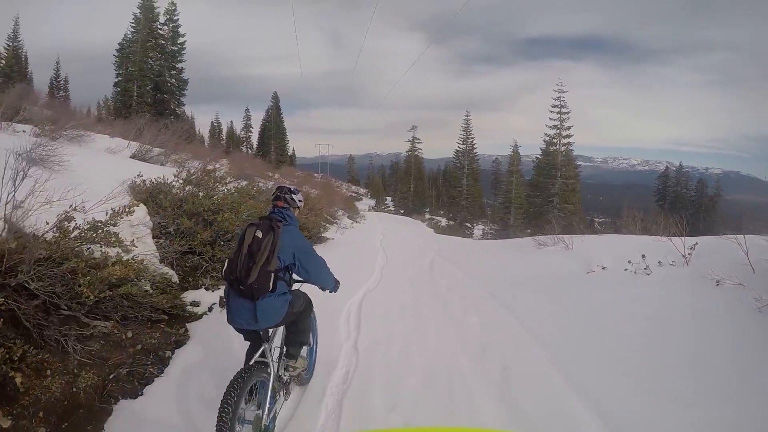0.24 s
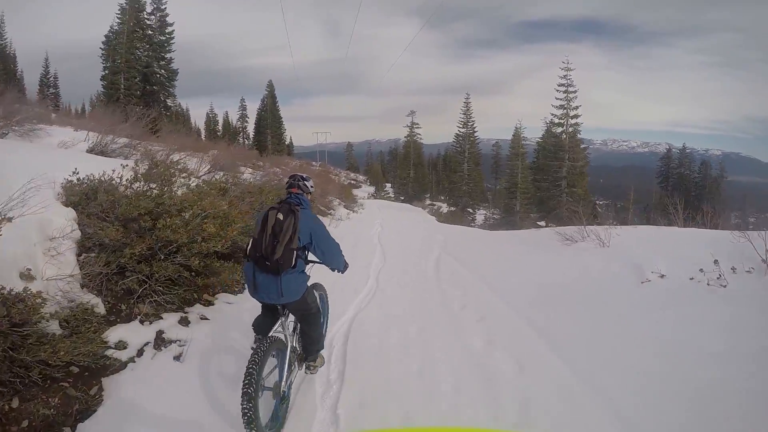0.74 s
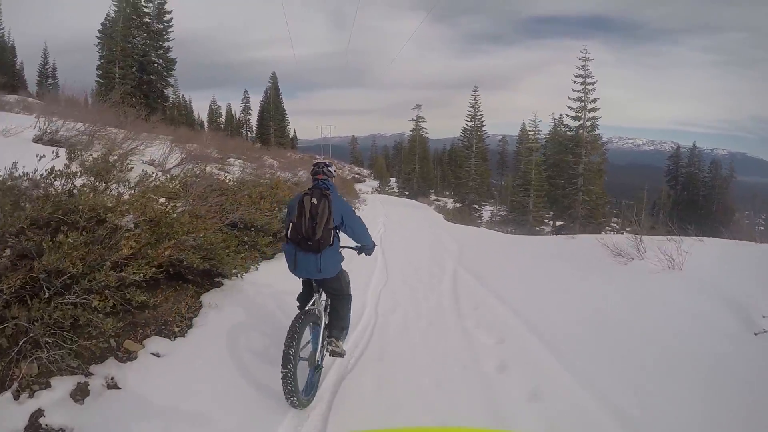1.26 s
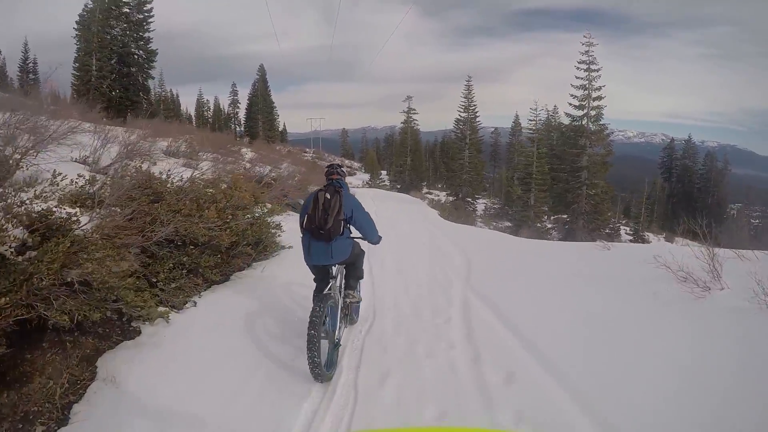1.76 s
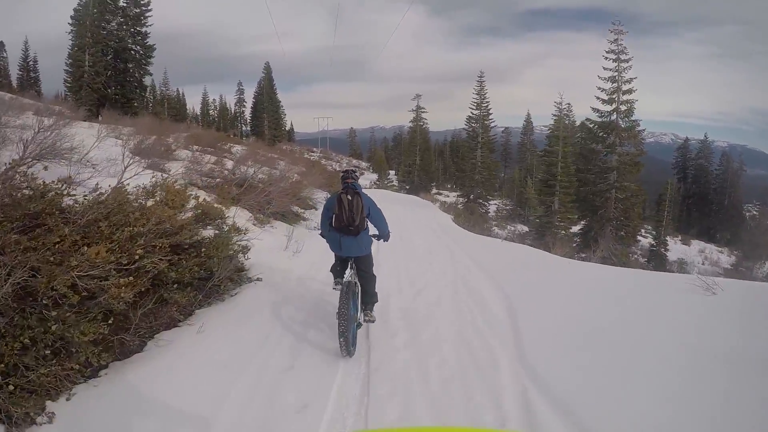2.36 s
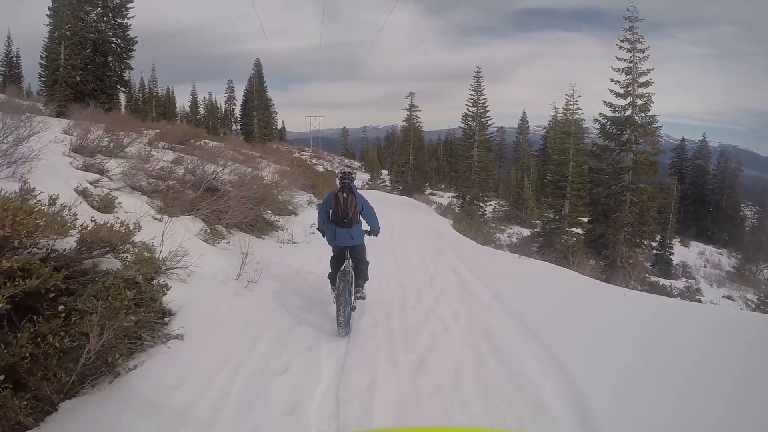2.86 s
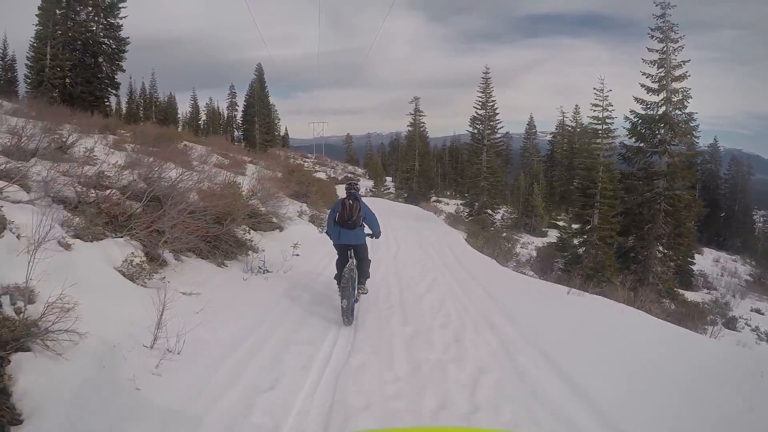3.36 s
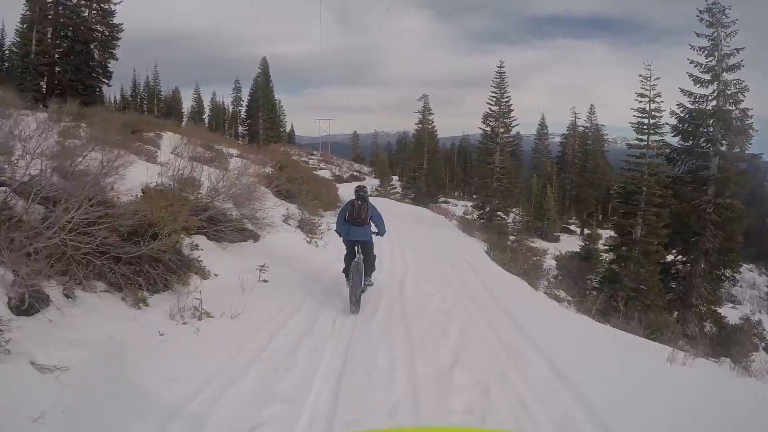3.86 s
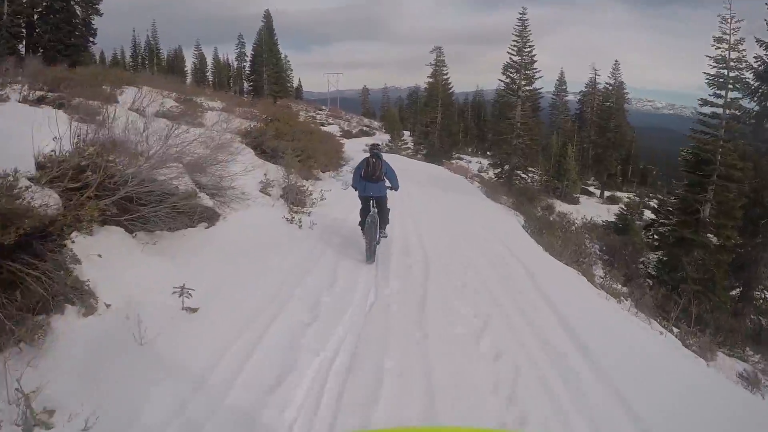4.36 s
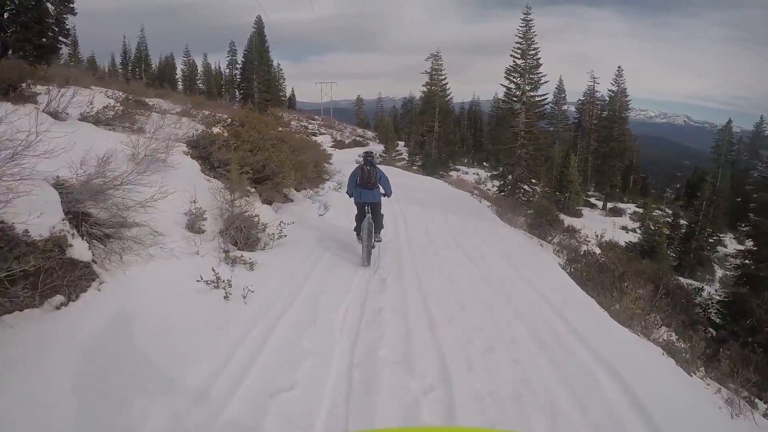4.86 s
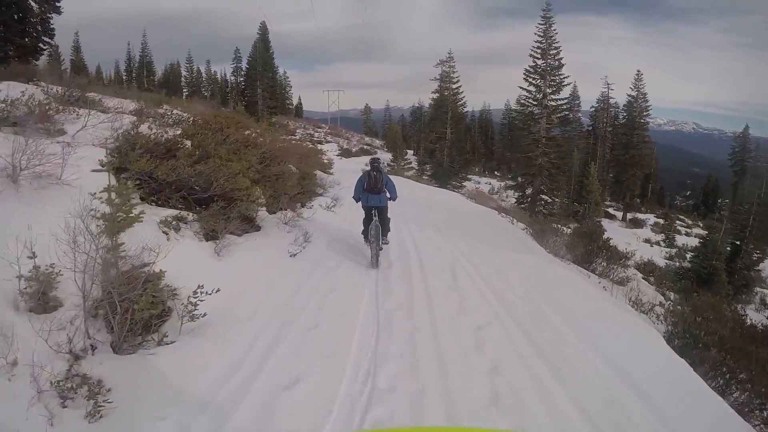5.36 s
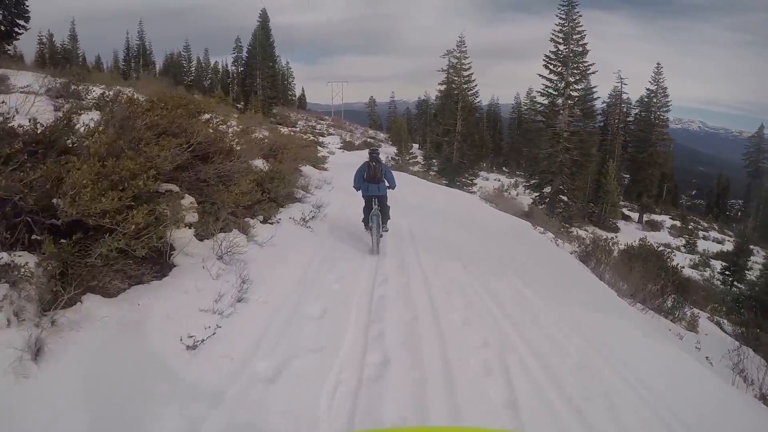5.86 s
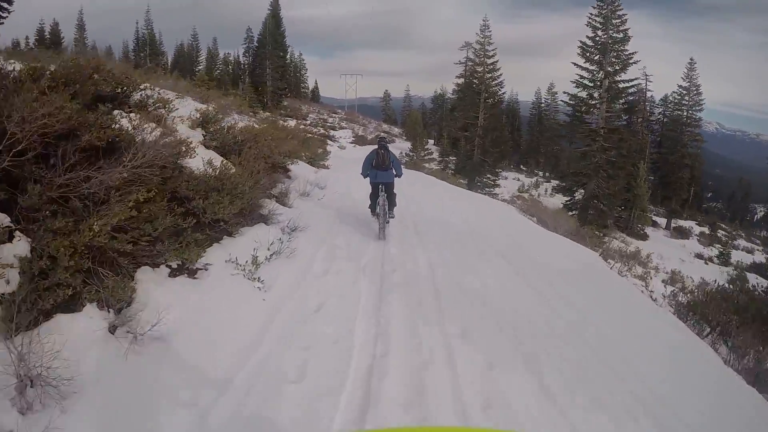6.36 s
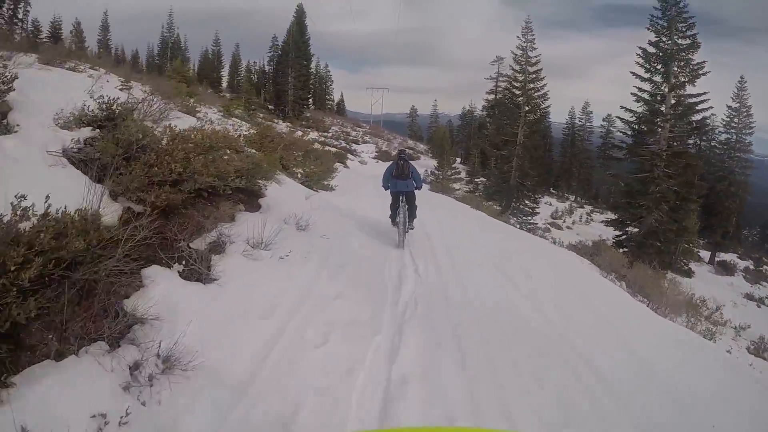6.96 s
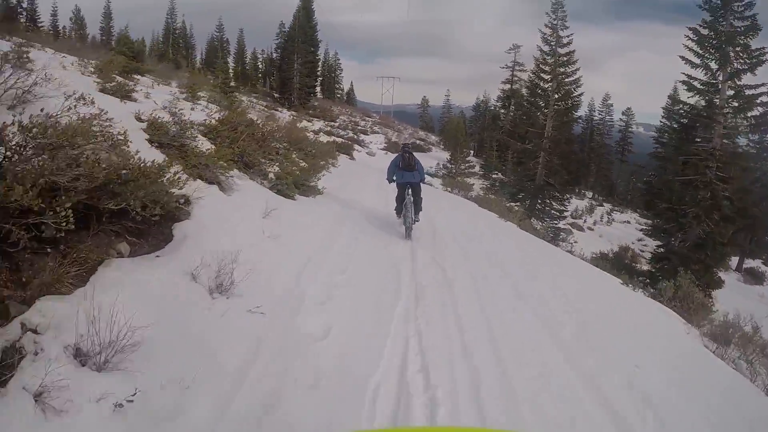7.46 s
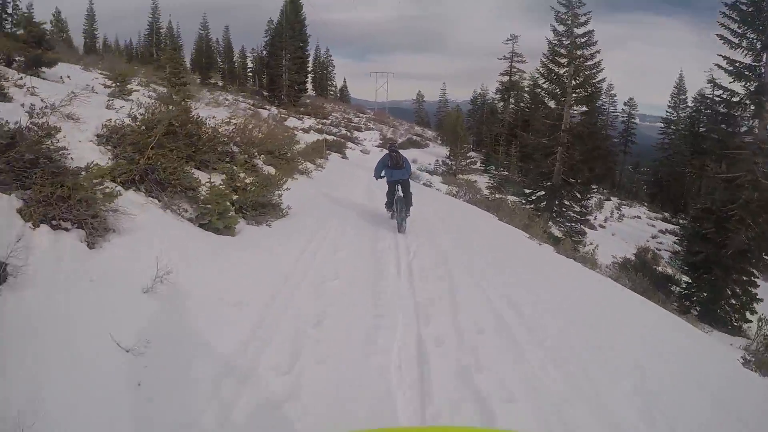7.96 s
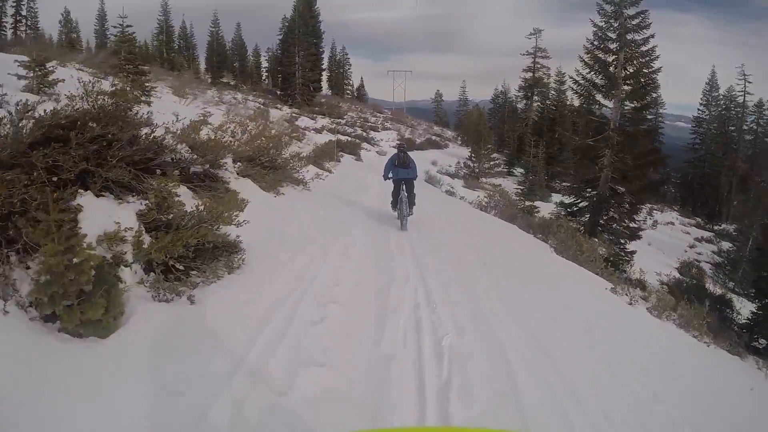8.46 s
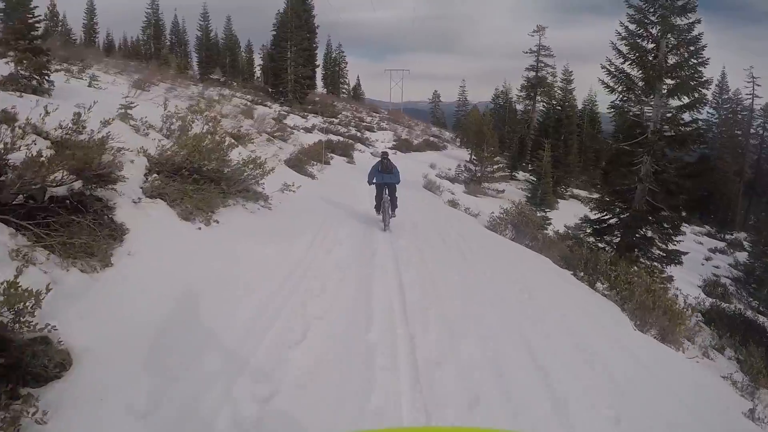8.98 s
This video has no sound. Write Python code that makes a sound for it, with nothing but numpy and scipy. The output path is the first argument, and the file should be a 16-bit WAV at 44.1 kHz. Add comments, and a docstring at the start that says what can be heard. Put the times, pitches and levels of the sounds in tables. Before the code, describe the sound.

A fat-tyred bike crunches over packed snow with soft thumps and plastic clacks, then gathers speed as heavy wind gusts buffet the microphone.

```python
"""Fat-bike tyres roll down a packed-snow trail, heard from a camera riding on the bike.
After a few pedal strokes it coasts. Filtered noise and clicks make the crunch and hiss of the snow, sines the hum.
Bumps make the camera's plastic mount clack: short contacts exciting resonances. Ice spits on it as bright noise.
As the bike gathers speed, gusty low noise buffets the microphone. Something squeaks once, as two wavering sines."""
import sys
import numpy as np
from scipy import signal
from scipy.fft import rfft, irfft, next_fast_len
from scipy.io import wavfile
from scipy.ndimage import uniform_filter1d

SR = 44100
rng = np.random.default_rng(int(sys.argv[2]) if len(sys.argv) > 2 else 0)


def store_pcm(level_fs):
    """Save levels as 16-bit WAV."""
    pcm = np.round(np.clip(level_fs, -1, 1) * 32767).astype(np.int16)
    wavfile.write(sys.argv[1], SR, np.atleast_2d(pcm).T)


N = 406602
TIME = np.arange(N) / SR  # seconds

# crunch of the freely rolling tyres: (time [s], level [dB])
ROLL_CURVE = [(0, -49), (3.27, -45.5), (3.5, -40.5), (3.95, -34.5), (4.6, -37), (4.85, -30.5), (6.4, -35.5),
              (7.42, -30), (7.87, -43), (8.2, -42.5), (8.55, -32), (8.87, -41), (9.22, -46)]
# drone of the tread, before its flutter: (time [s], fundamental level [dB], octave level [dB])
DRONE_CURVE = [(0, -60, -53), (0.45, -52, -45), (0.7, -53, -57), (1.15, -64, -61), (1.42, -42, -40),
               (1.65, -48.5, -54), (2.35, -56, -46.5), (2.65, -55, -59), (2.83, -59, -34.5),
               (2.97, -44.5, -53), (3.5, -43, -51.5)]
# rush of snow and air: (time [s], rush level [dB], fine spray level [dB])
RUSH_CURVE = [(0, -59.5, -66), (0.4, -52.5, -60), (0.66, -56.5, -64.5), (1.1, -52.5, -59),
              (1.5, -52.5, -66), (1.72, -55, -54), (2.0, -55.5, -63.5), (2.16, -57.5, -67),
              (3.23, -53, -62), (3.75, -48.5, -65), (4.0, -43.5, -60), (4.52, -49.5, -61.5),
              (5.0, -46, -60), (5.3, -39, -56.5), (5.6, -55.5, -65), (5.95, -50.5, -58.5),
              (6.4, -51, -65.5), (6.9, -43.5, -60.5), (7.42, -43.5, -53.5), (7.8, -45.5, -61),
              (8.07, -51, -65), (8.35, -51, -59.5), (8.7, -45.5, -62.5), (8.9, -52.5, -66),
              (9.22, -51, -67)]
# wind on the microphone, before its gusts: (time [s], slow buffeting level [dB], small eddies level [dB])
WIND_CURVE = [(0, -63, -52), (0.3, -46, -47), (0.55, -54, -67), (1.1, -45.5, -50.5), (1.45, -46, -55),
              (1.85, -45, -42), (1.95, -42, -68), (2.1, -46, -67), (2.51, -41.5, -59), (2.56, -26, -41),
              (2.9, -26.5, -45), (3.15, -30, -30), (3.32, -30.5, -40), (3.55, -26.5, -28.5),
              (3.72, -23, -28), (3.86, -17, -21.5), (4.1, -24.5, -23.5), (4.39, -26, -25),
              (4.48, -14, -20.5), (4.64, -23, -24), (4.77, -15, -18.5), (4.98, -26, -24.5),
              (5.16, -17, -19.5), (5.38, -17, -21.5), (5.57, -21.5, -27.5), (5.71, -13, -20.5),
              (5.86, -24.5, -23.5), (6.05, -18, -20), (6.29, -21.5, -18), (6.39, -23, -23.5),
              (6.52, -22, -19.5), (6.66, -24.5, -22.5), (6.83, -30, -24), (6.95, -19.5, -22.5),
              (7.22, -15, -22), (7.43, -23.5, -17.5), (7.6, -21.5, -21), (7.73, -13.5, -20.5),
              (7.85, -32, -26), (7.95, -18.5, -18.5), (8.1, -26, -25.5), (8.22, -19.5, -24),
              (8.5, -23.5, -21.5), (8.62, -17.5, -22.5), (8.77, -25.5, -27), (8.92, -12, -24.5),
              (9.05, -31, -21.5), (9.22, -19, -24.5)]
# lumps of snow giving way under a tyre: (time [s], peak level [dB], pitch [Hz])
SNOW_LUMPS = [(0.059, -28, 310), (0.124, -27.5, 305), (0.161, -18, 79), (0.237, -32, 342),
              (0.291, -21.5, 308), (0.3268, -17, 214), (0.39, -22.5, 324), (0.458, -27, 332),
              (0.493, -34, 303), (0.529, -28, 300), (0.78, -29.5, 395), (0.866, -30, 326),
              (1.012, -25, 417), (1.063, -27, 380), (1.345, -26, 315), (1.413, -25.5, 330),
              (1.527, -25.5, 300), (1.565, -23.5, 68), (1.757, -26, 154), (2.12, -28, 145),
              (2.229, -28, 393), (2.256, -30, 380), (2.59, -28.5, 400), (3.045, -25, 326),
              (3.41, -17.5, 78)]
# pedal strokes pressing the tyre into the snow: (start [s], length [s], crunch level [dB])
PEDAL_STROKES = [(0.125, 0.46, -41.5), (0.883, 0.26, -42.5), (1.297, 0.27, -41.5), (1.737, 0.16, -39),
                 (2.145, 0.35, -46.5), (2.616, 0.26, -39), (3.01, 0.17, -51)]
# clacks of the mount: (time [s], peak level [dB], treble share [dB], lowest mode's share [dB])
MOUNT_CLACKS = [(0.135, -36, -28, -17), (0.179, -20.5, -11, -18), (0.2782, -23, -20, -17),
                (0.2858, -28, -16, -12), (0.5887, -28, -6, -15), (0.7116, -25.5, -16, -19),
                (0.72, -25, -10, -19), (0.83, -28, -27, -14), (1.0243, -34, -18, -15),
                (1.136, -35, -14, -23), (1.1463, -23, -15, -19), (1.3556, -30, -19, -15),
                (1.4508, -31, -21, -15), (1.5612, -30, -3, -16), (1.716, -21, -9, -5.5),
                (1.776, -33, -14, -23), (2.08, -33, -18, -27), (2.1775, -32, -21, -29),
                (2.183, -32, -20, -8), (2.494, -34, -28, -13), (2.537, -31, -13, -22),
                (2.6411, -21, -19.5, -19.5), (2.6816, -36, -4, -17), (2.73, -34.5, -15, -23),
                (2.8282, -25, -19, -22), (2.8323, -21, -12, -14), (2.9359, -23, -16, -13),
                (3.016, -37.5, -6, -17), (3.058, -27.5, -20, -16), (3.1477, -32.5, -31, -3),
                (3.2095, -34, -20, -27), (3.3006, -27.5, -13.5, -10), (3.403, -24.5, -14.5, -9),
                (3.4852, -32.5, -18, -22), (3.7507, -19.5, -19.5, -15), (3.7568, -18, -20, -15),
                (3.872, -22.5, -18.5, -20), (3.893, -13.5, -22, -18.5), (4.0003, -26, -19.5, -15),
                (4.156, -17, -24, -14), (4.2438, -33.5, 4, -23), (4.2764, -20, -40, -27),
                (4.282, -17.5, -32, -33), (4.3364, -11.5, -22.5, -19), (4.3426, -16.5, -15.5, -10),
                (4.454, -11, -22, -15), (4.504, -28, -20, -24), (4.5361, -26, -16, -15),
                (4.7016, -15, -19.5, -9.5), (4.7061, -10.5, -15.5, -7.5), (4.7538, -27.5, -21, -12),
                (4.806, -21, -16, -2), (4.858, -22, -29, -9), (5.0168, -16, -17, -18),
                (5.019, -14, -13, -12.5), (5.195, -21.5, -20, -15), (5.2991, -17.5, -21, -14),
                (5.306, -15.5, -20.5, -15.5), (5.4583, -26, -16, -11), (5.6627, -21, -19.5, -20),
                (5.85, -18, -16.5, -18.5), (6.5173, -13, -13.5, -12.5), (6.6052, -25.5, -18.5, -6),
                (6.8348, -17, -16, -13), (6.8738, -25, -24, -10.5), (6.9128, -28.5, -15, -15),
                (7.071, -27, -18.5, -20), (7.21, -17, -5, -9), (7.262, -16, -18, -16),
                (7.2662, -19, -21, -8), (7.3259, -22, -18.5, -17), (7.479, -24, -17, -13),
                (7.5800, -21, -20, -17), (7.5945, -18.5, -14, -17), (7.724, -30, -25, -9),
                (7.756, -23.5, -22, -21), (7.854, -34, -27, -5), (7.8972, -21.5, -19, -15),
                (7.9909, -26, -27, -8.5), (8.1709, -18.5, -11.5, -7), (8.254, -23.5, -16, -9),
                (8.296, -21, -19.5, -3.5), (8.409, -15.5, -17.5, -12), (8.416, -13, -19, -9.5),
                (8.494, -27.5, -27, -21), (8.7162, -23, -12, -9.5), (8.8386, -16.5, -19.5, -17),
                (8.886, -27.5, -14, -6)]
# resonances of the mount and housing, before scatter: (frequency [Hz], width [Hz], level [dB])
MOUNT_MODES = [(1226, 180, 2.5), (1695, 223, 2), (1905, 355, -1.5), (2470, 140, -18), (2896, 240, -12),
               (3276, 640, -16), (3546, 350, -10), (4805, 890, -21.5), (5530, 240, -22), (5880, 1100, -35),
               (8700, 2500, -45), (10780, 1200, -39), (12900, 4800, -51.5), (14600, 600, -44)]
# scuffs, where a patch of crust crumbles under the tread: (time [s], dull crunch level [dB])
CRUST_SCUFFS = [(0.88, -40.5), (1.544, -40), (2.135, -38.5), (2.373, -32), (3.11, -36), (3.45, -45)]
# swishes, where a tyre's shoulder scrapes loose crystals: (time [s], half-length [s], level [dB])
SHOULDER_SWISHES = [(0.994, 0.009, -51), (1.96, 0.061, -62), (3.1, .02, -56.5), (6.08, 0.071, -63.5),
                    (7.81, 0.022, -55), (8.2, .03, -56), (8.424, 0.036, -59)]
# ice crumbs on the housing, before halving: (time [s], peak of the envelope [dB], decay each side [s])
ICE_SPITS = [(1.227, -42, 0.0025), (4.817, -43, 0.019), (7.612, -46, .015), (7.66, -31.5, 0.0063),
             (7.669, -23.5, 0.00087), (7.93, -37.5, 0.0071)]
# the one squeak, before its waver: (time [s], pitch [Hz], level [dB], octave against it [dB])
SQUEAK_CURVE = [(7.535, 6720, -76, -17), (7.558, 6700, -58, -8), (7.57, 6500, -55, -18),
                (7.582, 6550, -51, -4), (7.596, 6780, -41.5, -25), (7.635, 6650, -69, -30)]

# noise colours, of which only the shape counts: (frequency [Hz], density [dB per Hz])
TYRE_SPECTRUM = [(60, -11), (140, 0.5), (200, -6.5), (290, -2), (440, -3), (560, -14.5), (750, -18),
                 (1200, -28.5), (2500, -37), (5000, -71)]
RUSH_SPECTRUM = [(300, -2.5), (600, 1.5), (900, 0), (1300, -2), (1500, -3.5), (1900, -2), (2500, -9),
                 (3300, -16), (4000, -31), (6000, -51.5)]
SPRAY_SPECTRUM = [(2000, -1.5), (3300, 2), (4050, -3.5), (4800, -1), (5350, -11), (6800, -18.5),
                  (9000, -29.5), (12000, -27.5), (16000, -37.5)]
BUFFET_SPECTRUM = [(12, -12.5), (25, -1.5), (38, 1.5), (60, -3.5), (80, -9.5), (110, -16.5), (170, -40.5),
                   (400, -74)]
EDDY_SPECTRUM = [(35, -21.5), (70, 1.5), (110, -0.5), (180, -7), (260, -13), (400, -20.5), (700, -43),
                 (1500, -59)]
SPIT_SPECTRUM = [(2000, 9.5), (3500, 17.5), (4500, 3.5), (6600, 2.5), (8500, -6), (10500, 2), (12500, -17),
                 (15000, -25)]
MIC_HISS_SPECTRUM = [(1000, 3), (8100, -1), (8400, 5), (8700, -1), (12000, -5), (16000, -11)]

DRONE_HZ = 167.3
KNOB_ROWS_PER_S = 55  # average-scale rate of tread knobs meeting the snow, before jitter
GUSTS_PER_S, GUST_DB = 14, 1.5  # random gusts: rate and depth on the buffeting
STROKE_EDGE_S = 0.064  # attack and release
STROKE_RUSH_DB, STROKE_SPRAY_DB = -17, -24  # snow thrown by a stroke, against its crunch
SCUFF_S, SCUFF_GRIT_DB = 0.019, -12.5  # half-length; bright grit against the dull crunch
TICKS_PER_S, TICK_FOLLOWS = 31, 0.64  # faint mount ticks; their share of the rush's swing in dB
MODE_SCATTER = 0.014  # spread of each resonance's pitch, as a share of it
CUTOFF_HZ = 15700


def from_db(db):
    """Decibels to gain."""
    return 10 ** (np.asarray(db) / 20)


def rms_one(x):
    """Scale to unit power."""
    return x / np.sqrt(np.mean(x ** 2) + 1e-20)


def in_time(rows):
    """Each column of a curve at every sample."""
    times, *columns = np.transpose(rows)
    return [np.interp(TIME, times, column) for column in columns]


def drift(per_s):
    """Slow random wander of spread 1, with this many turning points a second."""
    knots = rng.standard_normal(8000)
    return rms_one(np.interp(TIME * per_s, np.arange(len(knots)), knots))


def colour(x, spectrum):
    """Causal (minimum-phase) filter with the given spectrum."""
    size = next_fast_len(len(x) + SR // 4)
    hz, db = np.transpose(spectrum)
    bins = np.maximum(np.fft.rfftfreq(size, 1 / SR), 1)
    octaves_below = np.maximum(np.log2(hz[0] / bins), 0)
    octaves_above = np.maximum(np.log2(bins / hz[-1]), 0)
    # past either end the spectrum falls by 10 dB an octave
    gain = from_db(np.interp(np.log(bins), np.log(hz), db) - 10 * (octaves_below + octaves_above))
    # folding the cepstrum forward gives minimum phase
    cepstrum = irfft(np.log(gain), size)
    cepstrum[1:size // 2] *= 2
    cepstrum[size // 2 + 1:] = 0
    return irfft(rfft(x, size) * np.exp(rfft(cepstrum)), size)[:len(x)]


def even(x, span_s):
    """Level the power over stretches of this length; faster lumps stay."""
    power = uniform_filter1d(x ** 2, max(int(span_s * SR), 2))
    return x / np.sqrt(np.maximum(power, 1e-20))


def grains(per_s, spread_db):
    """Random clicks of uneven size and sign."""
    sizes = from_db(spread_db * np.minimum(rng.exponential(1, N), 4))
    signed = sizes * rng.choice([-1, 1], N)
    return signed * (rng.random(N) < per_s / SR)


def add(out, s, sound, peak_db):
    """Mix a short sound in at a time and a peak level."""
    at = max(int(s * SR), 0)
    scaled = from_db(peak_db) * sound / np.abs(sound).max()
    out[at:at + len(sound)] += scaled[:N - at]


def knobs(jitter, uneven_db):
    """Rows of knobs punch into the crust, loosely in step and each with its own force."""
    rate = KNOB_ROWS_PER_S * np.exp(jitter * drift(KNOB_ROWS_PER_S))
    rows = np.floor(np.cumsum(rate) / SR)
    force = from_db(uneven_db * np.clip(rng.standard_normal(N), -2, 2))
    return np.diff(rows, prepend=rows[0]) * force


def tyres(crush, waver, flutter_db):
    """Knobs punch in and snow collapses in steps, thudding through the casing; the tread drones with its octave."""
    roll_db, = in_time(ROLL_CURVE)
    drone_db, octave_db = in_time(DRONE_CURVE)
    collapse = grains(per_s=600, spread_db=2.5) + 0.12 * rng.standard_normal(N)
    steps = collapse * from_db(1.8 * crush) + 2.7 * knobs(jitter=0.45, uneven_db=4.5)
    crunch_gain = np.hypot(from_db(roll_db), pedalling())
    crunch = crunch_gain * even(colour(steps, TYRE_SPECTRUM), 0.1)
    phase = 2 * np.pi * np.cumsum(DRONE_HZ * (1 + waver * drift(30))) / SR
    low = from_db(drone_db + flutter_db * drift(25)) * np.sin(phase)
    high = from_db(octave_db + flutter_db * drift(12)) * np.sin(2 * phase)
    return crunch + low + high


def crumbling(per_s, spread_db, grit, patchy_db, count=13):
    """Fine hiss and tiny fractures, drawn afresh in each half-octave, which swells by itself."""
    out, edges = 0, np.geomspace(250, 16000, count)
    for band in zip(edges, edges[1:]):
        cracks = rng.standard_normal(N) + grit * grains(per_s, spread_db)
        swell = from_db(patchy_db * drift(22))
        band_filter = signal.butter(2, band, "band", fs=SR, output="sos")
        out = out + swell * signal.sosfilt(band_filter, cracks)
    return out


def snow(crush, swell_db):
    """Air and crumbling snow rush under thrown crystals; both rise with pedal strokes, crystals with swishes."""
    rush_db, spray_db = in_time(RUSH_CURVE)
    push = pedalling()
    swell = from_db(swell_db * crush)
    swish = sum(from_db(db) * np.exp(-((TIME - s) / length) ** 2) for s, length, db in SHOULDER_SWISHES)
    coarse = crumbling(per_s=130, spread_db=3.5, grit=8.5, patchy_db=2.0)
    rush = colour(coarse * swell, RUSH_SPECTRUM)
    fine = crumbling(per_s=260, spread_db=3.5, grit=3.1, patchy_db=2.0)
    crystals = colour(fine * swell, SPRAY_SPECTRUM)
    # powers add, so the gains join as root sums of squares
    rush_gain = np.hypot(from_db(rush_db), from_db(STROKE_RUSH_DB) * push)
    spray_gain = np.sqrt(from_db(spray_db) ** 2 + (from_db(STROKE_SPRAY_DB) * push) ** 2 + swish ** 2)
    return rush_gain * even(rush, 0.16) + spray_gain * even(crystals, 0.39)


def wind(lumpy_db, slap_db):
    """Large slow eddies slap the microphone port in gusts; smaller ones flutter over them in the same bursts."""
    buffet_db, eddy_db = in_time(WIND_CURVE)
    gust_db = GUST_DB * drift(GUSTS_PER_S)
    bursts = drift(55)
    slaps = rng.standard_normal(N) * from_db(slap_db * bursts)
    buffet = even(colour(slaps, BUFFET_SPECTRUM), 0.12)
    flutter = rng.standard_normal(N) * from_db(lumpy_db * bursts)
    eddies = even(colour(flutter, EDDY_SPECTRUM), 0.16)
    return from_db(buffet_db + gust_db) * buffet + from_db(eddy_db + gust_db / 2) * eddies


def resonate(x, hz, width_hz):
    """A resonance applied twice: steep skirts, gain about 1 on top."""
    r = np.exp(-np.pi * width_hz / SR)
    gain = (1 - r * r) / 2
    section = [gain, 0, -gain, 1, -2 * r * np.cos(2 * np.pi * min(hz, SR / 2) / SR), r * r]
    return signal.sosfilt([section, section], x)


def housing(contact, uneven_db, tilt_db=0, lowest_db=0, crack_db=0):
    """Plastic rings briefly, its modes scattered each time; tilt lifts the upper ones, crack only the top ones."""
    out = 0
    for k, (hz, width, db) in enumerate(MOUNT_MODES):
        octaves = np.log2(hz / 1800)
        strength_db = db + tilt_db * np.clip(octaves, 0, 1) + crack_db * (octaves > 2) + lowest_db * (k == 0)
        ring = resonate(contact, hz * (1 + MODE_SCATTER * rng.standard_normal()), width)
        strength = from_db(strength_db + uneven_db * rng.standard_normal())
        out = out + (-1) ** k * strength * ring  # neighbouring modes have opposite sign
    return out


def chatter(level_db):
    """The mount ticks faintly throughout, louder as the rush of the ride grows."""
    rush_db, _ = in_time(RUSH_CURVE)
    ticks = grains(per_s=TICKS_PER_S, spread_db=2.0) + 1e-9 * rng.standard_normal(N)
    follow_db = TICK_FOLLOWS * (rush_db - rush_db.mean())
    return from_db(level_db + follow_db) * rms_one(housing(ticks, uneven_db=0.5))


def thumps(cycles, crumble):
    """A lump breaks: the casing gives a quickly damped swing, with a little crumbling."""
    out, t = np.zeros(N), TIME[:SR // 16]
    for s, db, hz in SNOW_LUMPS:
        age = t * hz / cycles
        push = np.sin(2 * np.pi * hz * t) * np.sqrt(age) * np.exp(-age)
        crumbs = rms_one(colour(rng.standard_normal(len(t)), TYRE_SPECTRUM)) * np.exp(-t / 0.006)
        add(out, s, push + crumble * crumbs, db)
    return out


def pedalling():
    """Each stroke loads the tyre, holds and lets go: a gain envelope with sloping edges."""
    push = 0
    for s, length, db in PEDAL_STROKES:
        inside_s = np.minimum(TIME - s, s + length - TIME)  # to the nearer end
        push = push + from_db(db) * np.clip(inside_s / STROKE_EDGE_S + 0.5, 0, 1)
    return push


def clacks(slip_s, grind, usual_treble_db, usual_lowest_db, hardness, usual_db, crack):
    """The joint starts to slip, hits its stop a moment later and grinds briefly on; hard hits ring brighter."""
    out, t = np.zeros(N), TIME[:SR // 25]
    stop = SR // 2500  # samples from slip to stop
    for s, db, treble_db, lowest_db in MOUNT_CLACKS:
        contact = grind * rng.standard_normal(len(t)) * np.exp(-t / slip_s)
        contact[stop] += 1
        tilt_db = hardness * (treble_db - usual_treble_db)
        knock = housing(contact, 0.78, tilt_db, lowest_db - usual_lowest_db, crack * (db - usual_db))
        add(out, s - stop / SR, knock, db)
    return out


def scuffs():
    """A short run of fractures, heard dully through the casing and as grit through the air."""
    shape = sum(from_db(db) * np.exp(-((TIME - s) / SCUFF_S) ** 2) for s, db in CRUST_SCUFFS)
    cracks = grains(per_s=700, spread_db=4.0) + 0.12 * rng.standard_normal(N)
    dull = even(colour(cracks, TYRE_SPECTRUM), 2 * SCUFF_S)
    grit = even(colour(cracks, RUSH_SPECTRUM), 2 * SCUFF_S)
    return shape * (dull + from_db(SCUFF_GRIT_DB) * grit)


def spits():
    """Ice crumbs hit the housing: short bright sprinkles of noise that swell and die away."""
    shape = sum(from_db(db) * np.exp(-np.abs(TIME - s) / length) for s, db, length in ICE_SPITS)
    return 0.5 * shape * rms_one(colour(rng.standard_normal(N), SPIT_SPECTRUM))


def squeak(waver):
    """Rubbing parts sing a thin, unsteady note and its octave."""
    hz, db, octave_db = in_time(SQUEAK_CURVE)
    phase = 2 * np.pi * np.cumsum(hz * (1 + waver * drift(500))) / SR
    sounding = (TIME > SQUEAK_CURVE[0][0]) & (TIME < SQUEAK_CURVE[-1][0])
    note = np.sin(phase) + from_db(octave_db) * np.sin(2 * phase)
    return sounding * from_db(db + 2.5 * drift(200)) * note


def scene():
    """All the layers add up dry, close to the microphone in open air."""
    crush = np.clip(drift(45), -2, 2)  # the crust gives way in uneven spurts
    tread = tyres(crush, waver=0.005, flutter_db=2.5) + thumps(cycles=0.67, crumble=0.54) + scuffs()
    hiss = snow(crush, swell_db=2.9)
    knocks = clacks(slip_s=0.0022, grind=0.12, usual_treble_db=-17.5, usual_lowest_db=-14.5,
                    hardness=0.92, usual_db=-23.5, crack=0.35)
    mount = knocks + chatter(level_db=-64.0)
    air = wind(lumpy_db=2.5, slap_db=3.0)
    return (tread + hiss + air + mount + spits() + squeak(waver=0.0049))[None]


def record(dry):
    """The microphone adds a faint hiss; the end is softened and the top is cut."""
    hiss = from_db(-71.5) * rms_one(colour(rng.standard_normal(N), MIC_HISS_SPECTRUM))
    fade = np.minimum((TIME[-1] - TIME) / 0.004, 1)
    top_cut = signal.ellip(10, 0.2, 80, CUTOFF_HZ, fs=SR, output="sos")
    return signal.sosfilt(top_cut, fade * (dry + hiss))


dry = scene()
out = record(dry)
store_pcm(out)
```